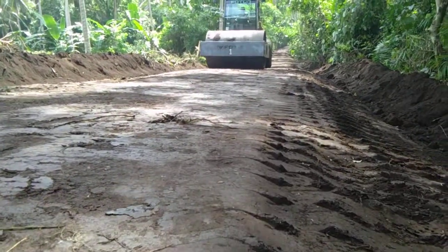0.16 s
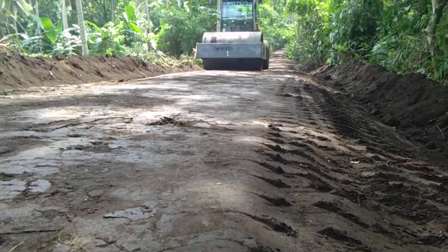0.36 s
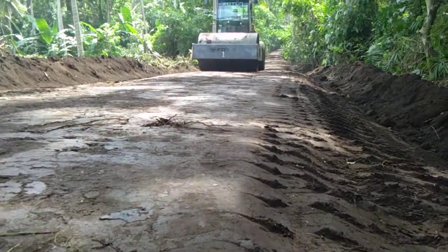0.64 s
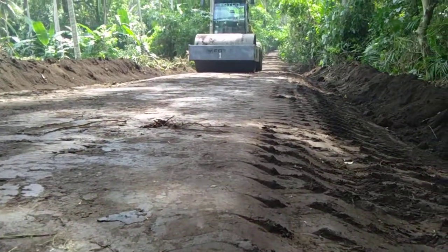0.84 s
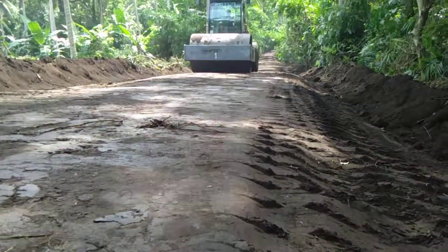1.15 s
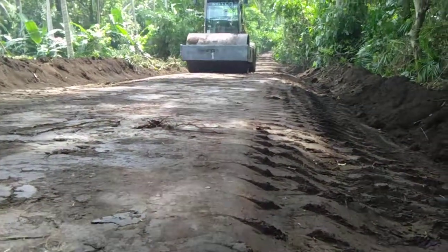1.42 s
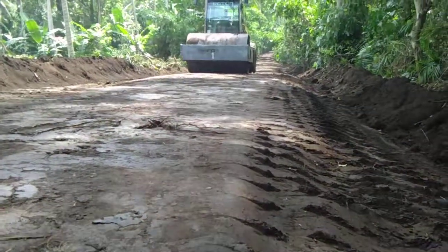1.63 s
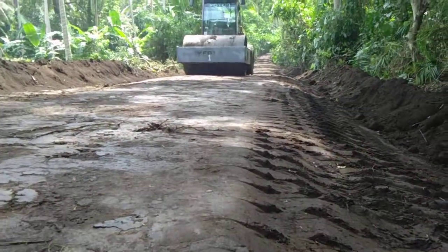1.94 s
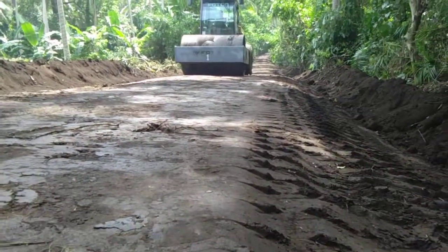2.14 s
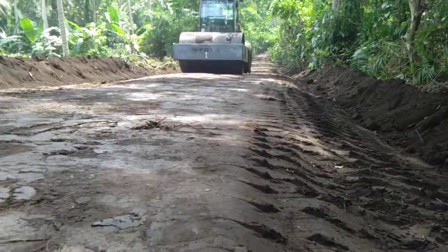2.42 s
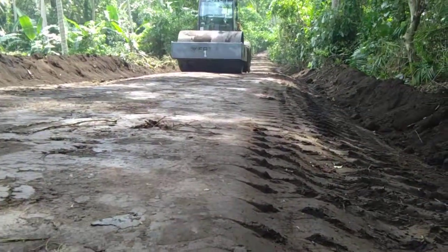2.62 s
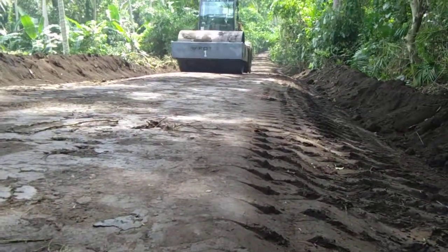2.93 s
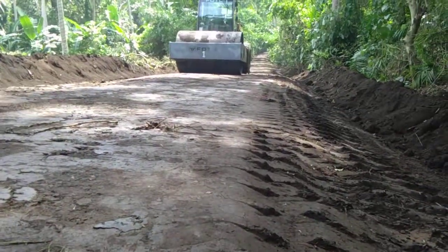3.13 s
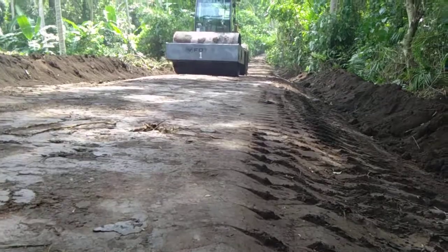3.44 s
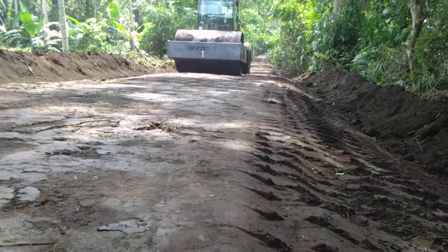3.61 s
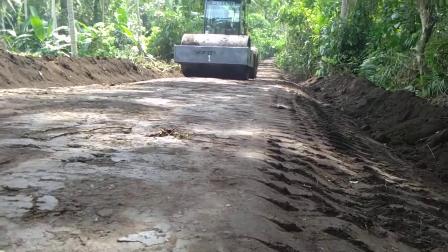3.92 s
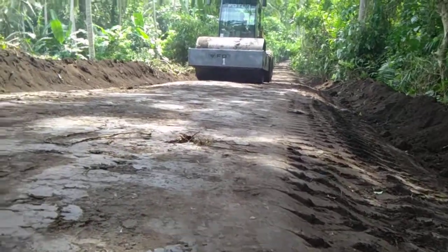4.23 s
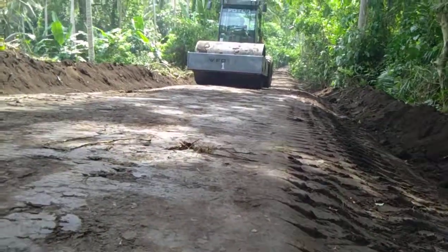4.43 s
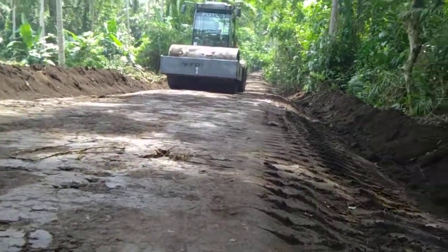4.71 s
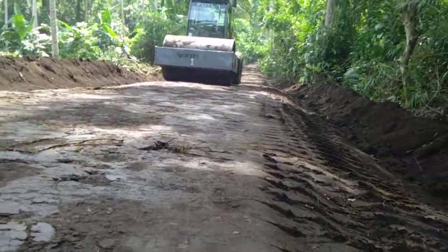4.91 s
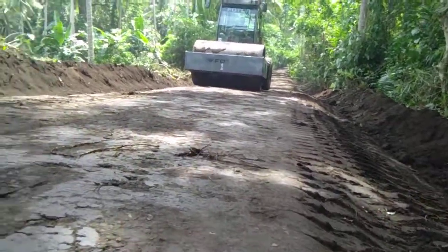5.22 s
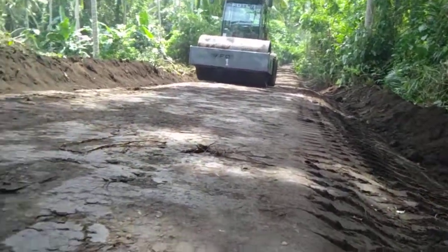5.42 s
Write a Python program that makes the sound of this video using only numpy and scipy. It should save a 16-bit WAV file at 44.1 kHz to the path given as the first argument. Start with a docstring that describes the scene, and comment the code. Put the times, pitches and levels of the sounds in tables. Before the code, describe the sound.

Steady low engine drone with soft roar and hiss creeps nearer outdoors, with wind buffeting and popping mainly in the first second.

```python
"""A single-drum road roller creeps up a dirt road towards a phone held low between trees.
From the start its four-cylinder diesel hums at the firing rate under a broad roar and steady hiss, the drum
shakes and the fan sings, while wind rumbles on the microphone and pops crowd into the first second or so.
The machine, built of shaft-locked sines and coloured noise, grows as the distance closes; the fan blades stand
out most near 2.5 s, a few more pops follow, and a brighter hiss sets in at 5.24 s."""
import sys
import numpy as np
from scipy import signal
from scipy.fft import rfft, irfft, next_fast_len
from scipy.io import wavfile
from scipy.ndimage import uniform_filter1d

SR = 44100
rng = np.random.default_rng(int(sys.argv[2]) if len(sys.argv) > 2 else 0)


def store_wav(level_fs):
    """Save 16-bit WAV to argv[1]."""
    pcm = np.round(np.clip(np.atleast_2d(level_fs), -1, 1) * 32767)
    wavfile.write(sys.argv[1], SR, pcm.T.astype(np.int16))


N = 245195
T = np.arange(N) / SR  # seconds

START_M, SPEED_M_S = 24.3, .9  # distance from the microphone at the start, rolling speed
FIRING_HZ, HUNT_HZ, HUNT_PER_S = 77.5, .12, 1.5  # governed firing rate, its wander, changes a second
FAN_PER_CRANK = 4 / 3  # fan turns per crankshaft turn
HUM_DB, ROAR_DB, BOOM_DB, HISS_DB = -22, -35.5, -34, -41  # levels at the start
KNOCK_DB, OVERTONE_DB = -1.5, -20  # trim of the knock table; hum's second harmonic, against the hum
DRUM_HZ, DRUM_DB = 22.5, -20  # shake rate; level against the hum at the start
BOOM_GROWS_DB_S = 0.37  # the boom gains faster than the approach alone
SWELLS_DB, SWELLS_PER_S = 1.5, 6  # random swells of the boom: spread, changes a second
HISS_FOLLOWS = 0.69  # share of the approach (in dB) that the hiss takes part in
BRIGHT_S, BRIGHT_RISE_S, BRIGHT_DB = 5.24, .22, -39.5  # brighter hiss: start, rise time, level
POP_CYCLES, POP_CYCLES_PER_DB = .4, .02  # half length of a full-scale pop; weaker ones last longer
TOP_HZ = 15500  # upper limit of the phone


def undb(db):
    """Decibels to gain."""
    return 10 ** (np.asarray(db) / 20)


def level_over_time(table):
    """Gain against time, from rows of seconds and dB."""
    seconds, db = np.transpose(table)
    return undb(np.interp(T, seconds, db))


def walk(rate):
    """Random levels held 1 / rate s and slewed twice; spread near 1."""
    hold = int(SR / rate)
    steps = np.repeat(rng.standard_normal(N // hold + 1), hold)
    slewed = uniform_filter1d(uniform_filter1d(steps, hold), hold)
    return 1.5 * slewed[:N]


def noise(spectrum, flicker_db, rate):
    """Coloured noise of rms 1 whose half-octave bands flicker on their own."""
    size = next_fast_len(N)
    octave = np.log2(np.arange(1, size // 2 + 2) * SR / size)
    hz, db = np.transpose(spectrum)
    colour = undb(np.interp(octave, np.log2(hz), db, left=-90, right=-90))
    shaped = rfft(rng.standard_normal(size)) * colour
    out = 0
    for centre in np.arange(np.log2(hz[0]), np.log2(hz[-1]) + .5, .5):
        band = np.clip(1 - 2 * np.abs(octave - centre), 0, 1)  # overlapping triangles
        out = out + irfft(shaped * band, size)[:N] * undb(flicker_db * walk(rate))
    return out / out.std()


def tones(turns, orders, waver_db, rate):
    """Sines locked to a shaft; the level of each wavers at random."""
    out = 0
    for order, db in orders:
        level = np.sqrt(2) * undb(db + waver_db * walk(rate))  # root 2: dB is rms
        out = out + level * np.sin(2 * np.pi * (order * turns + rng.random()))
    return out


def closing_db():
    """Level gained as the machine rolls nearer: pressure goes as one over distance."""
    return 20 * np.log10(START_M / (START_M - SPEED_M_S * T))


def wind_rumble():
    """Low coloured noise on the microphone that follows the gusts."""
    # Each row: time in seconds, rumble level in dB.
    gusts = [(0, -31), (.3, -35), (.6, -33), (.8, -38), (1.1, -29.5), (1.7, -33.5), (2.1, -35.5),
             (2.7, -34.5), (3.2, -32), (3.5, -44.5), (4.2, -34.5), (4.6, -41), (5.1, -42), (5.4, -32),
             (5.56, -34)]
    # Each row: frequency in Hz, relative level in dB per Hz.
    rumble_colour = [(25, -21.5), (40, -20.5), (65, -3), (110, 4), (170, -6), (260, -14), (400, -17.5),
                     (700, -30.5)]
    return level_over_time(gusts) * noise(rumble_colour, flicker_db=1.8, rate=18)


def wind_pops():
    """Single eddies on the microphone, each a short sine of one or two swings."""
    # Each row: time of the middle in seconds, level in dB, pitch in Hz.
    eddies = [(.097, -14, 110), (.494, -5, 115), (.507, -13, 100), (.622, -16, 130), (.634, -11, 125),
              (.646, -17, 200), (.657, -4, 140), (.689, -10, 170), (.701, -14, 130), (.9, -18, 110),
              (.916, -10, 115), (.934, -11, 150), (.944, -15, 190), (.987, -15, 110), (1.026, -5, 125),
              (1.037, -7, 170), (1.058, -3, 125), (1.12, -14, 110), (1.145, -16, 190), (2.715, -17, 110),
              (2.8, -20, 120), (3.068, -18, 100), (4.303, -17, 130)]
    # Second and third harmonic of a pop, as shares of the first.
    edge = .13, .06
    out = np.zeros(N)
    for s, db, hz in eddies:
        span = slice(int((s - .05) * SR), int((s + .05) * SR))
        age = T[span] - s
        half_length = POP_CYCLES - POP_CYCLES_PER_DB * db  # cycles
        swing = np.exp(-np.abs(hz * age / half_length) ** 1.5)
        # suction first, then pressure, as the eddy sweeps past the port
        turn = 2 * np.pi * hz * age
        # harmonics steepen the edge between the two
        wave = np.sin(turn) + edge[0] * np.sin(2 * turn) + edge[1] * np.sin(3 * turn)
        out[span] += undb(db) * swing * wave
    return out


def steady_hiss():
    """Smooth treble noise that gains only part of the approach."""
    # Each row: frequency in Hz, relative level in dB per Hz.
    hiss_colour = [(2500, -7), (4500, -5.5), (5600, -1.5), (6800, 0.5), (7300, -4), (7900, -10),
                   (8400, -19.5), (10000, -28), (12500, -39), (16000, -35)]
    level = undb(HISS_DB + HISS_FOLLOWS * closing_db())
    return level * noise(hiss_colour, flicker_db=.03, rate=7.4)


def brighter_hiss():
    """A second treble noise that ramps in late and stays."""
    # Each row: frequency in Hz, relative level in dB per Hz.
    bright_colour = [(3500, -13), (5000, -3), (5800, -2), (6600, 0), (7800, -9), (9500, -27.5),
                     (13000, -37)]
    rise = np.clip((T - BRIGHT_S) / BRIGHT_RISE_S, 0, 1)
    return undb(BRIGHT_DB) * rise * noise(bright_colour, flicker_db=.6, rate=15)


def roar():
    """Broad noise of exhaust, fan air and drum on soil."""
    # Each row: frequency in Hz, relative level in dB per Hz.
    roar_colour = [(24, -15), (45, -14), (120, 1.5), (240, -6), (360, 0), (430, -3), (490, -5), (620, -9),
                   (950, -13.5), (1300, -10.5), (1600, -13), (1700, -15), (2800, -17), (3300, -22),
                   (5000, -21)]
    return undb(ROAR_DB) * noise(roar_colour, flicker_db=.7, rate=8)


def boom():
    """Low resonant exhaust noise near 175 Hz that swells at random and grows."""
    # Each row: frequency in Hz, relative level in dB per Hz.
    boom_colour = [(115, -20), (140, -7), (160, -1), (180, 0), (200, -5), (230, -18)]
    level = undb(BOOM_DB + BOOM_GROWS_DB_S * T + SWELLS_DB * walk(SWELLS_PER_S))
    return level * noise(boom_colour, flicker_db=1, rate=10)


def drum_shake():
    """The drum's shake, one low sine with a slightly wandering phase."""
    turns = DRUM_HZ * T + .03 * walk(1.5)
    return undb(HUM_DB) * tones(turns, [(1, DRUM_DB)], waver_db=.6, rate=2.5)


def blade_tone(fan_turns):
    """Tone at ten cycles each fan turn, twice the rate at which the five blades pass, with its own level over
    time."""
    # Each row: time in seconds, level in dB.
    blade_levels = [(0, -51), (2.3, -49.5), (2.5, -45.5), (4.7, -49), (5.56, -46.5)]
    return level_over_time(blade_levels) * tones(fan_turns, [(10, 0)], waver_db=1, rate=5)


def fan_and_pumps(fan_turns):
    """Sines of the belt-driven fan and pumps, geared to the crankshaft."""
    # Each row: cycles per fan turn, level in dB against the hum.
    fan_orders = [(1, -33), (5, -28), (11.49, -36), (16.82, -40), (26.45, -37), (49.37, -46), (53.93, -45)]
    return undb(HUM_DB) * tones(fan_turns, fan_orders, waver_db=2, rate=2)


def engine(crank):
    """Firing hum, two pulses a crank turn, with the knock of firings and gears at higher orders."""
    # Each row: cycles per crankshaft turn, level in dB ahead of the knock trim.
    knock_orders = [(6, -34), (10, -34), (12, -33), (20, -41), (24, -37), (25, -41), (26, -36), (28, -33),
                    (29, -44), (30, -36), (34, -43), (36, -39), (38, -43), (40, -43)]
    hum = tones(crank, [(2, 0)], waver_db=0.33, rate=2.95)
    overtone = tones(crank, [(4, OVERTONE_DB)], waver_db=2, rate=3)
    knock = undb(KNOCK_DB) * tones(crank, knock_orders, waver_db=2, rate=4)
    return undb(HUM_DB) * (hum + overtone + knock)


def roller():
    """The whole machine on one crankshaft; drum shake and blade tone stay out of the approach gain."""
    firing_hz = FIRING_HZ + HUNT_HZ * walk(HUNT_PER_S)
    crank = np.cumsum(firing_hz / 2) / SR  # turns; four cylinders fire twice a turn
    fan_turns = FAN_PER_CRANK * crank
    nearing = engine(crank) + fan_and_pumps(fan_turns) + roar() + boom()
    return undb(closing_db()) * nearing + drum_shake() + blade_tone(fan_turns)


def scene():
    """Wind, hiss and roller at one microphone."""
    return (wind_rumble() + wind_pops() + steady_hiss() + brighter_hiss() + roller())[None]


def record(dry):
    """The phone cuts the top with a steep low-pass."""
    return signal.sosfilt(signal.ellip(16, .2, 70, TOP_HZ, fs=SR, output="sos"), dry)


dry = scene()
out = record(dry)
store_wav(out)
```